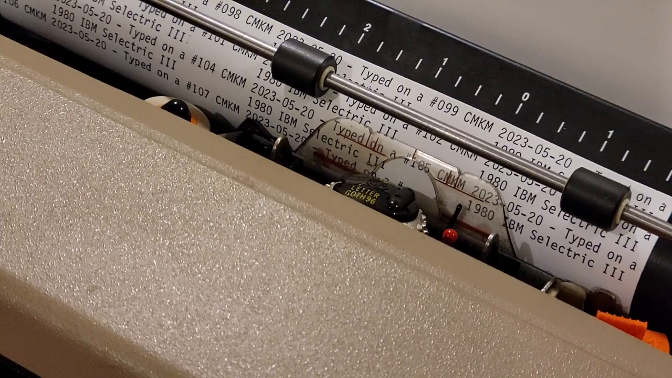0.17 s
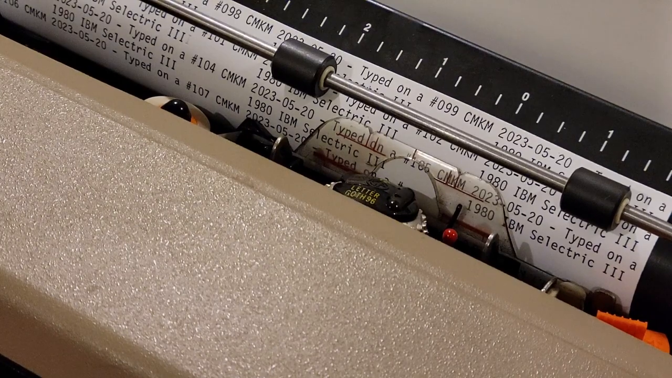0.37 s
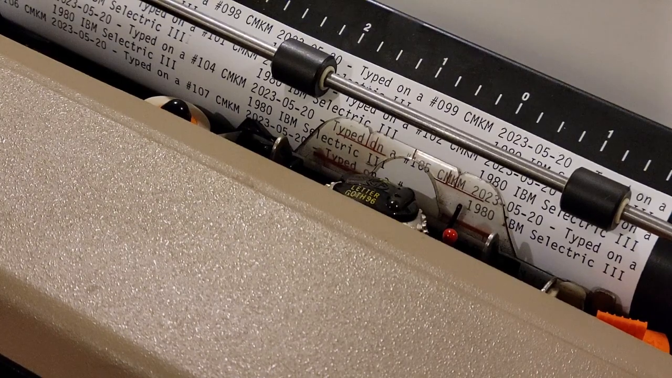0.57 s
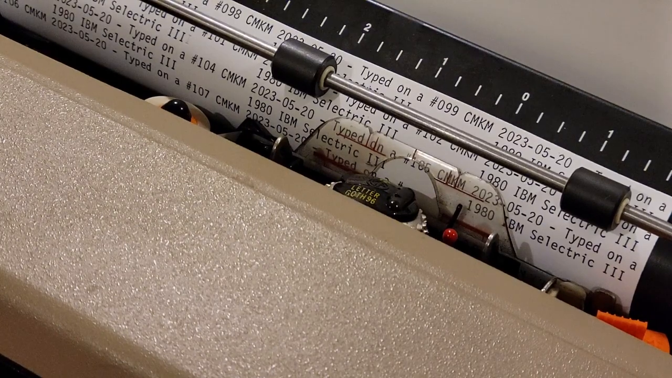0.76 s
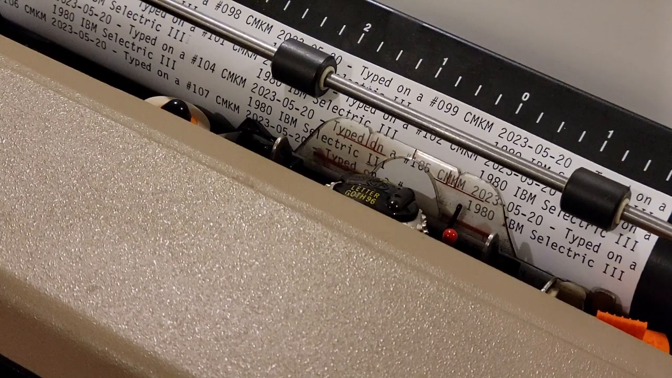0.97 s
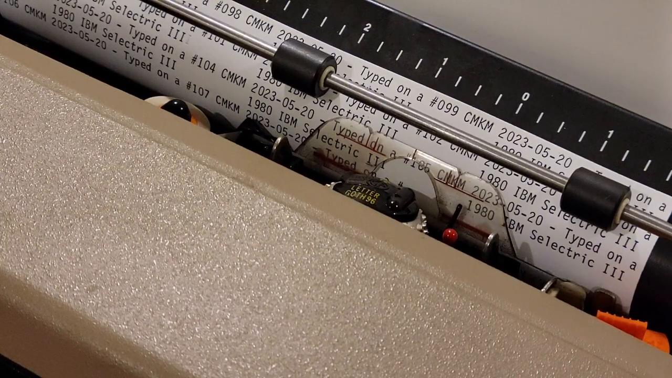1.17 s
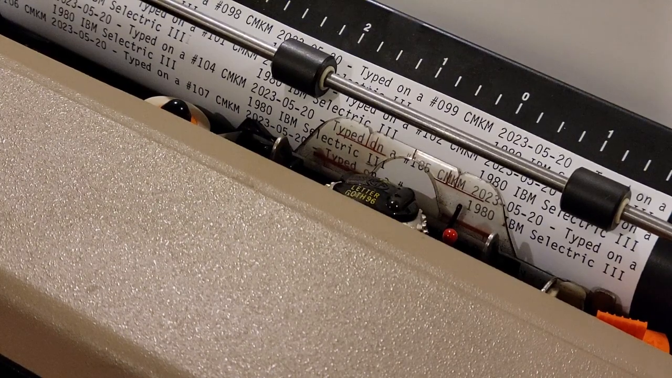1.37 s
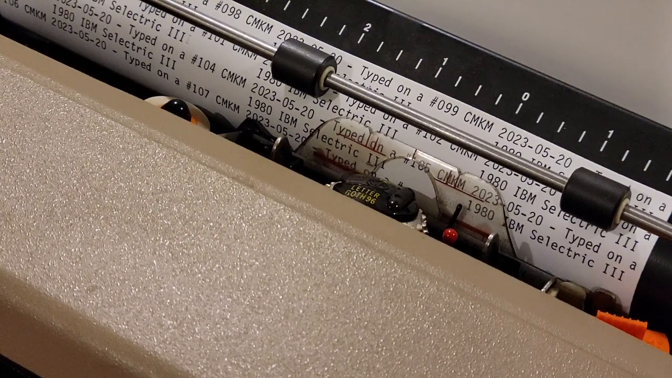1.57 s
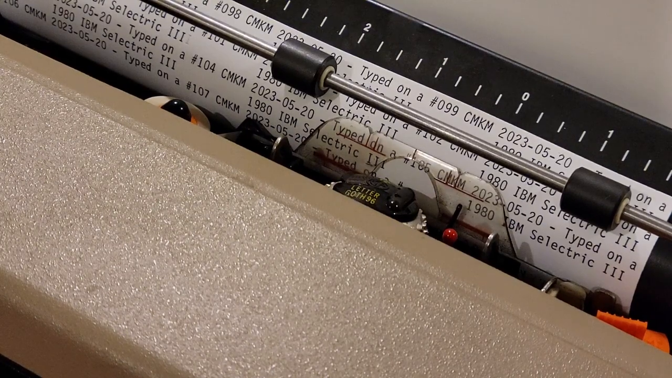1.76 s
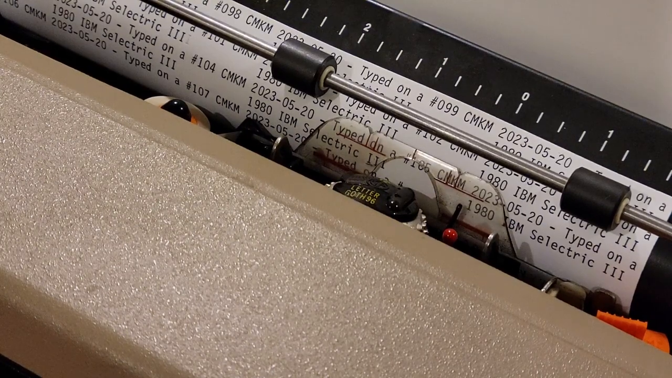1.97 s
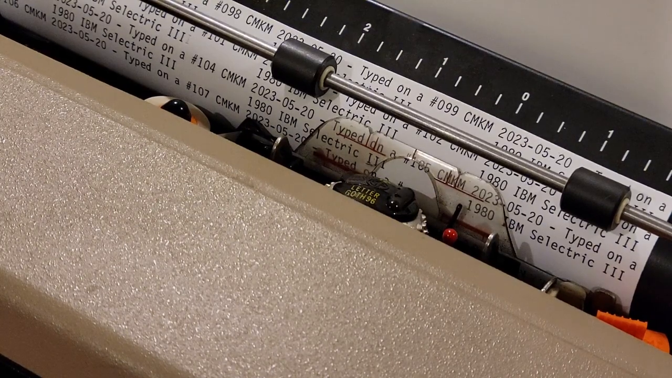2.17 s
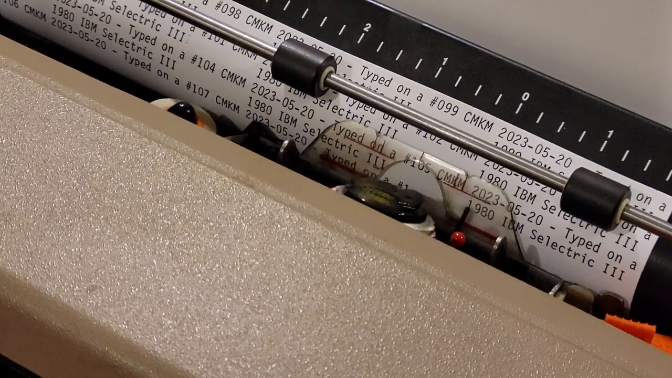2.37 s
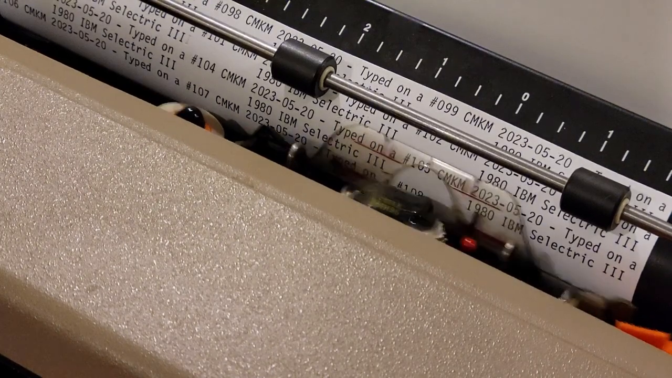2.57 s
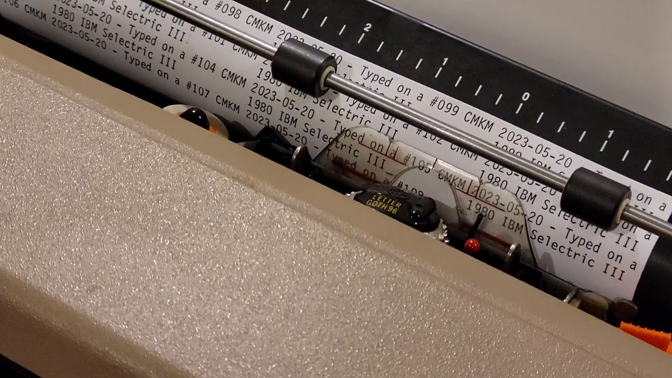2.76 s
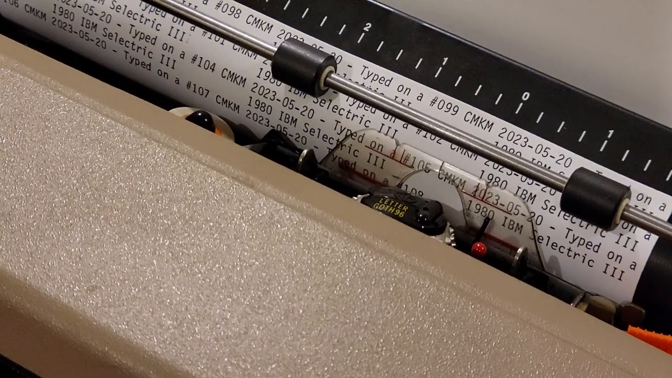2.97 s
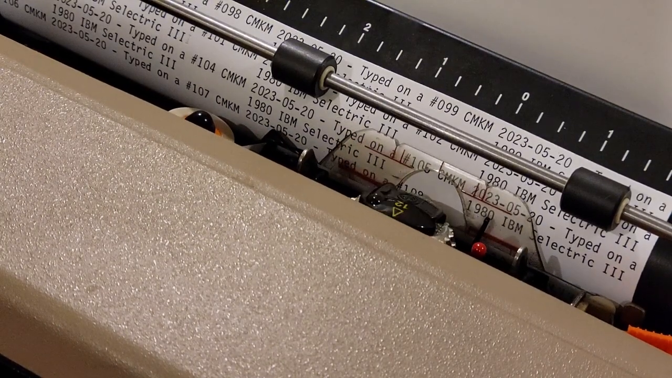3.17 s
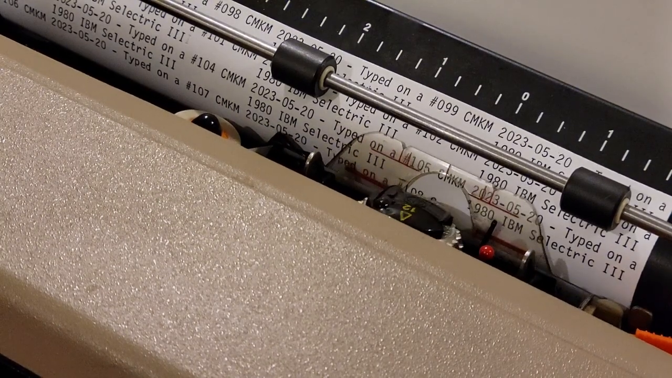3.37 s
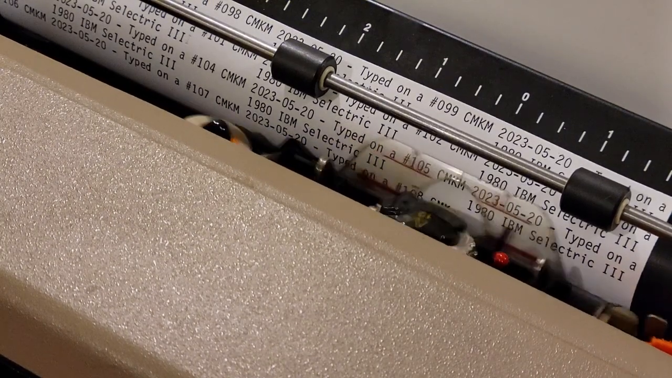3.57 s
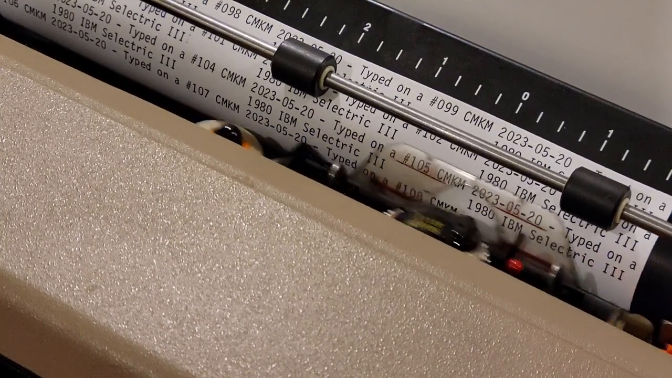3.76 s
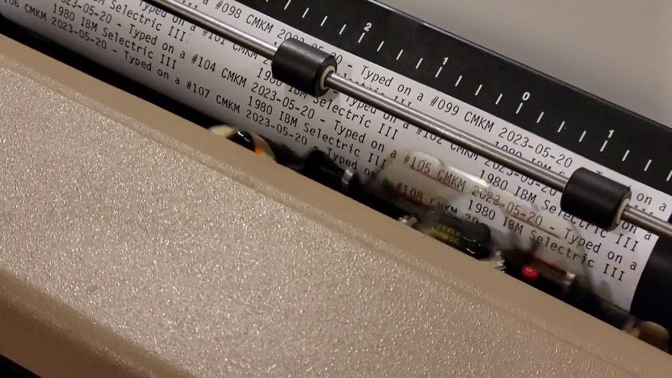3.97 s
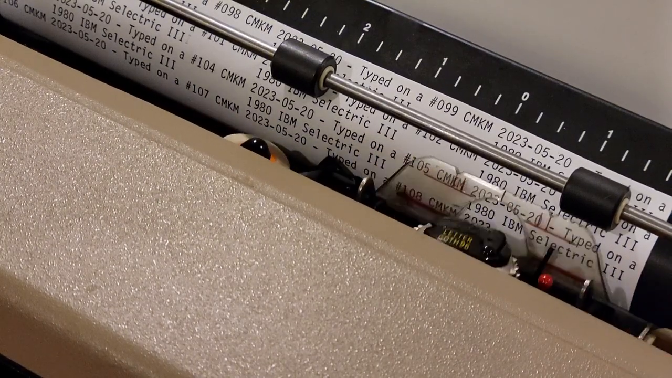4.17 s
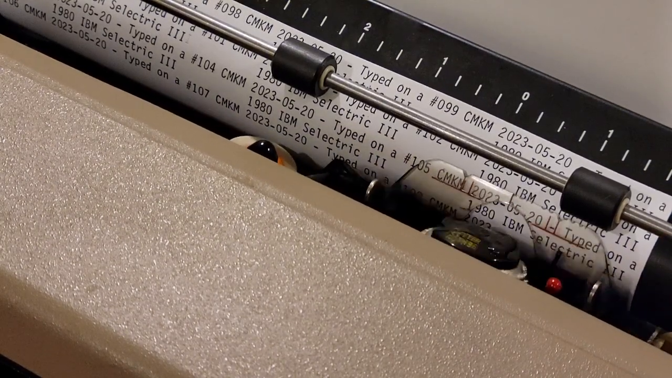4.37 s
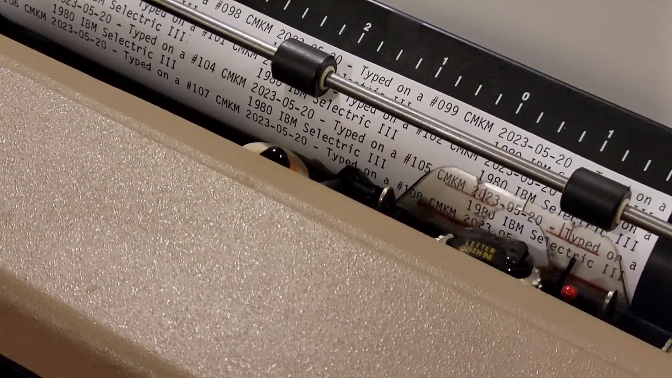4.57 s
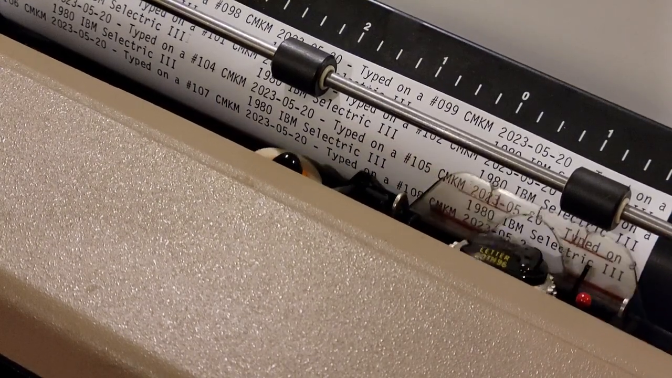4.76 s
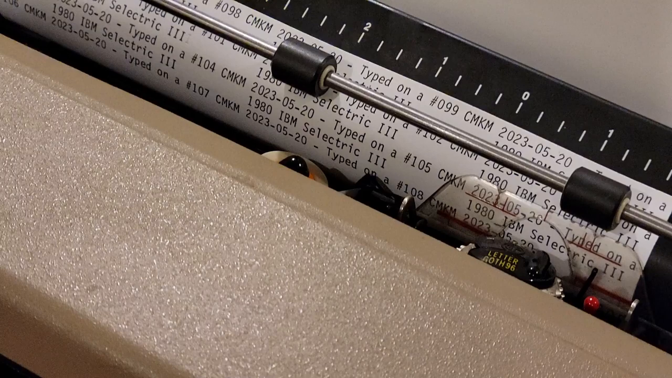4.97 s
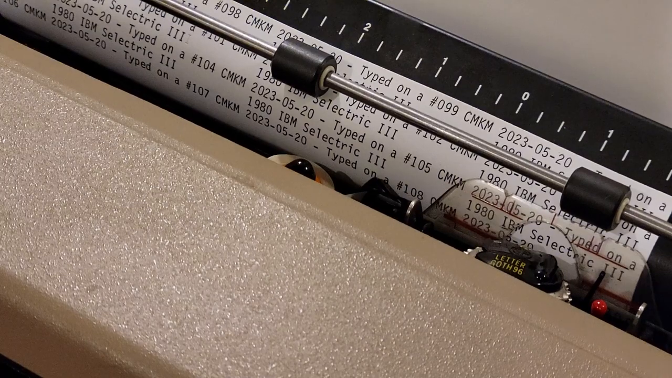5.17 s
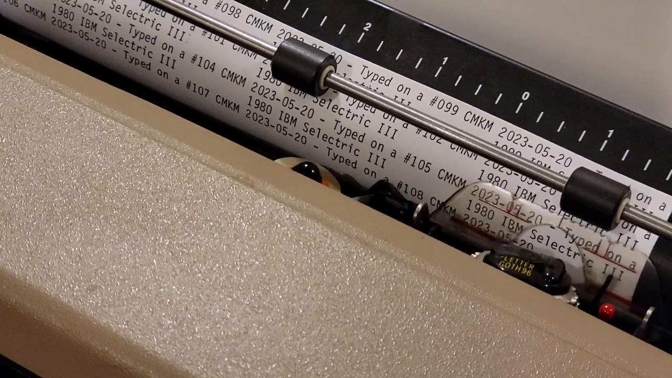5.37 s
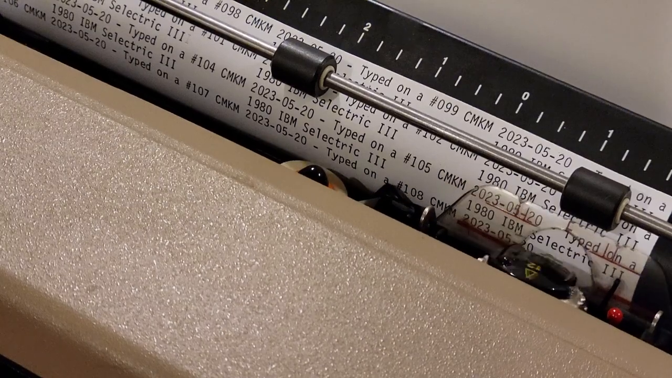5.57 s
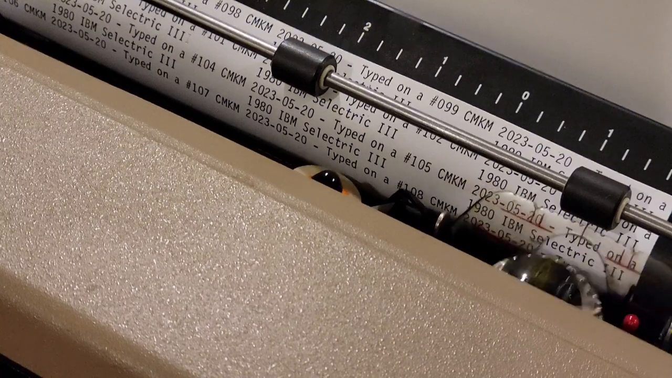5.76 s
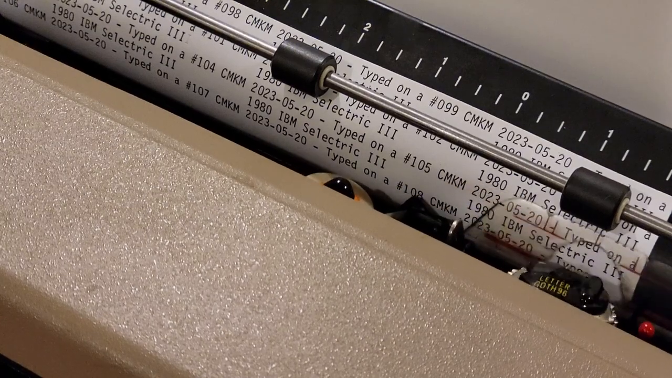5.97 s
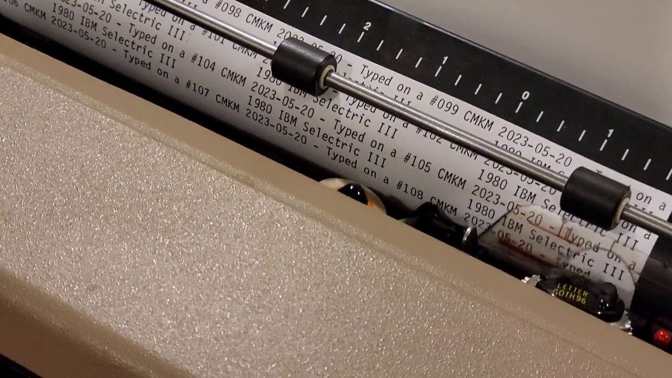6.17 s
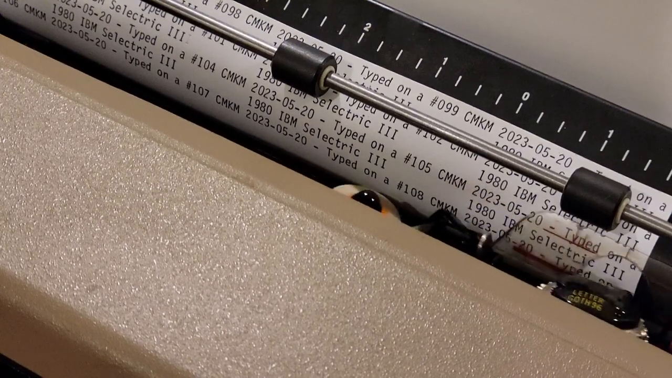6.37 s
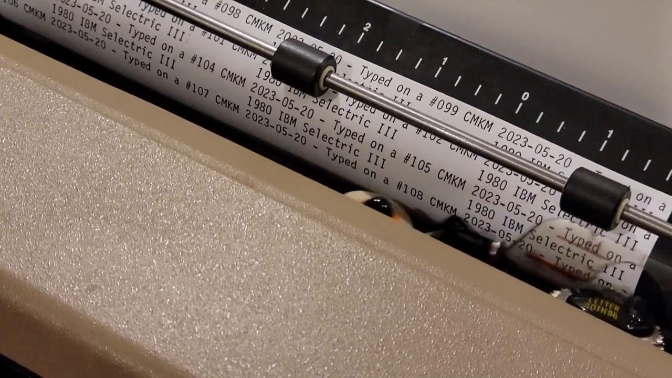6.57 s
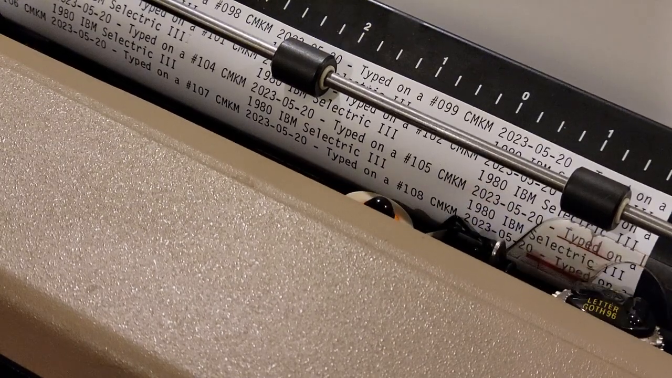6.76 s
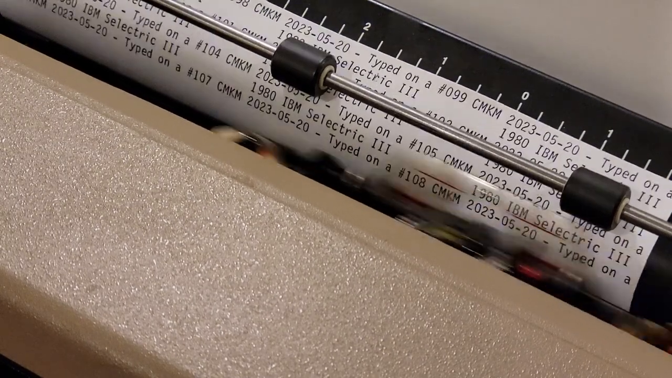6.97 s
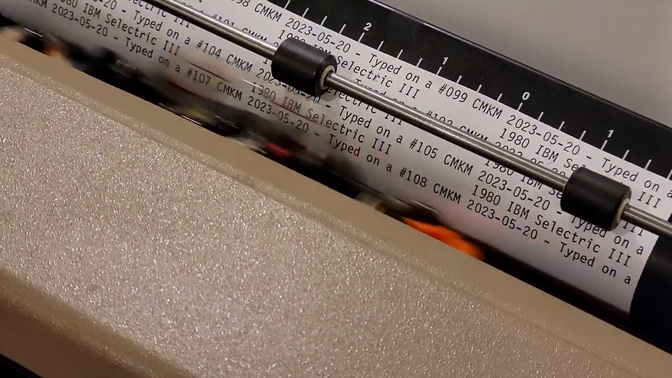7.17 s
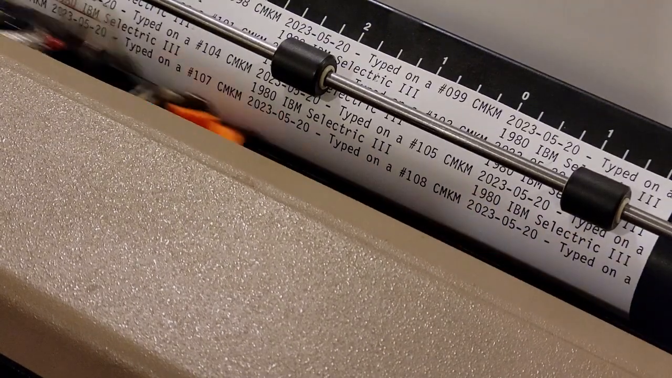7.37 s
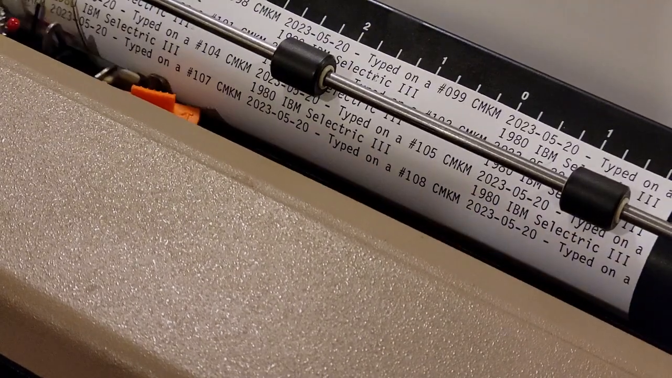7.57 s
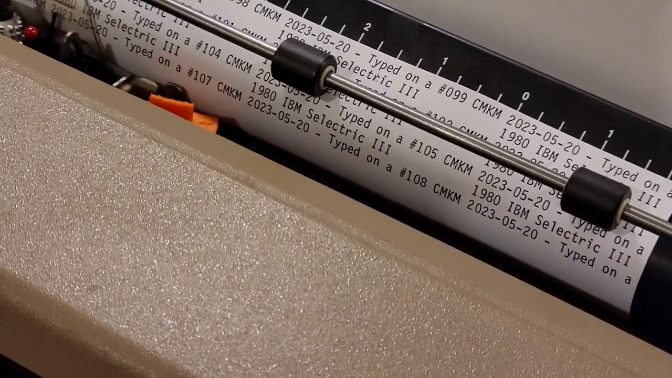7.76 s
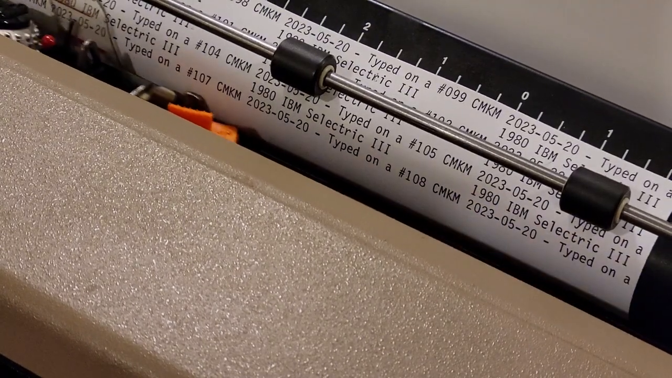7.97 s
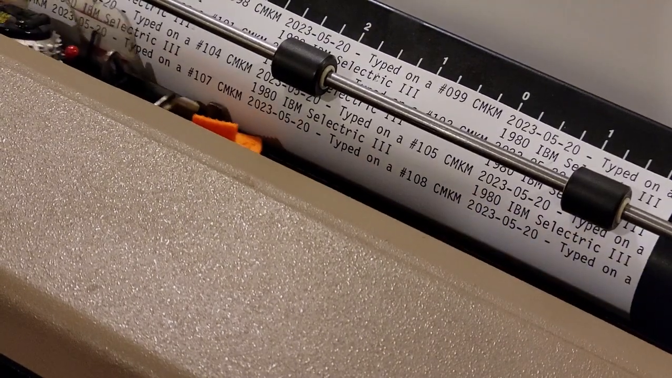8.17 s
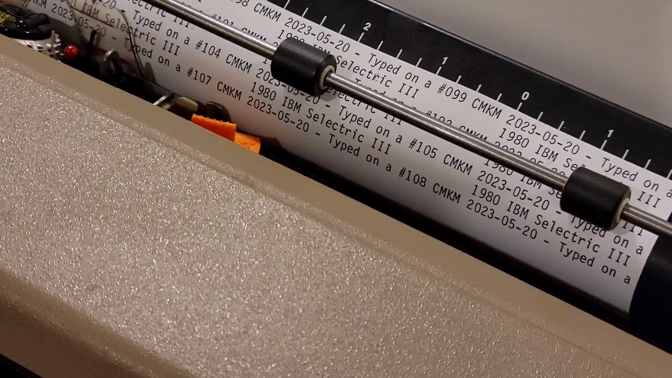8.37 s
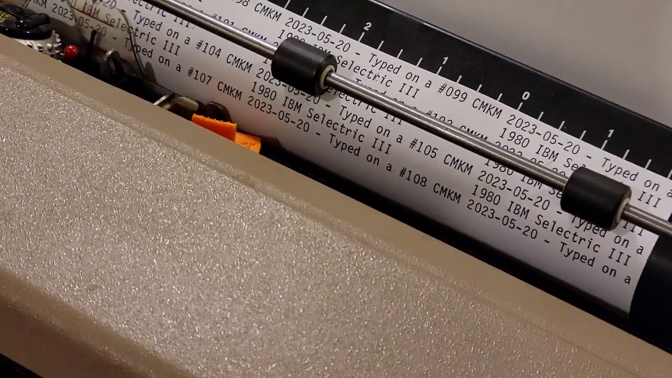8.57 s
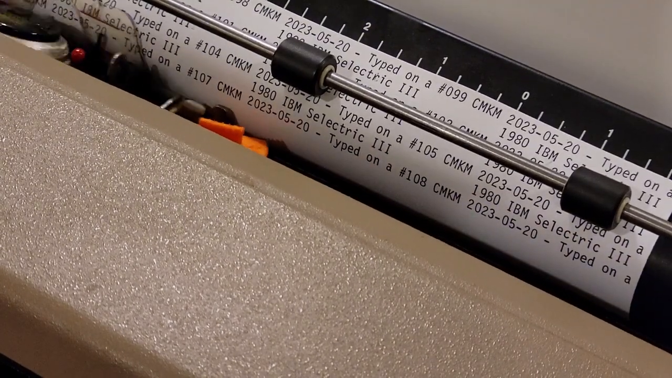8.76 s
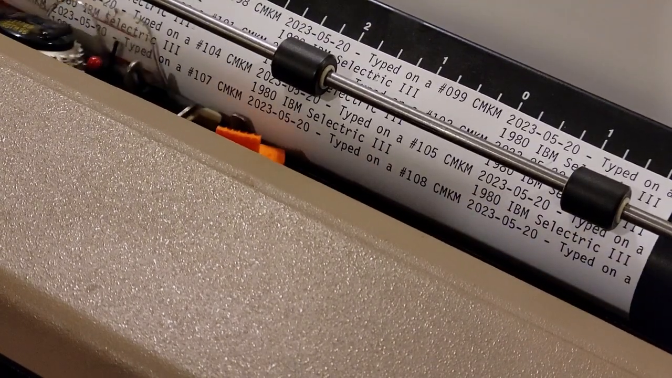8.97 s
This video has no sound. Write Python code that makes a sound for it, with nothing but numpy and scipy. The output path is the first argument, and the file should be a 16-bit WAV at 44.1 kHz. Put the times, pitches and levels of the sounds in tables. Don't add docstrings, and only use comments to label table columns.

```python
import sys
import numpy as np
from scipy import signal
from scipy.fft import rfft, irfft, next_fast_len
from scipy.io import wavfile
from scipy.ndimage import uniform_filter1d, map_coordinates

SR = 44100
rng = np.random.default_rng(int(sys.argv[2]) if len(sys.argv) > 2 else 0)


def volts_from_db(level):
    exponent = np.asarray(level, float) / 20
    return 10 ** exponent


def file_out(sig):
    cols = np.atleast_2d(sig).T
    lim = np.clip(cols, -1, 1)
    pcm = np.round(lim * 32767).astype(np.int16)
    wavfile.write(sys.argv[1], SR, pcm)


N = 397782

SHAFT_HZ = 29.38
PLAY_S, PLAY_DB = 0.0005, 1.5

# (frequency [Hz], width [Hz], level [dB])
CASING_MODES = [(2050, 810, -12), (2697, 505, 0), (3003, 162, 3.5), (3295, 560, -4)]
# (head lands [s], landing level [dB], clatter level [dB], relative casing ring [dB])
TYPED_LETTERS = [(2.35, -8.5, -10, 2.5), (2.467, -6, -9.5, 3), (2.57, -8.5, -8.5, 0), (3.352, -7, -9, 2),
                 (3.505, -9.5, -11.5, 2), (3.569, -8.5, -9.5, 1.5), (3.664, -5, -9.5, 1),
                 (3.909, -5.5, -10, 0.5), (3.972, -8, -10.5, 0), (4.04, -10, -9.5, 2), (4.116, -8.5, -9, 2),
                 (4.241, -8, -8.5, -0.5), (4.403, -6, -8, -2), (4.527, -8, -9, 0.5), (4.617, -11, -9, -0.5),
                 (4.731, -3.5, -9.5, -0.5), (4.823, -6.5, -9.5, 0.5), (5.281, -12, -9, 0.5),
                 (5.627, -8, -8, 0.5), (5.746, -12, -9.5, 1), (5.811, -16.5, -11, 2.5),
                 (5.91, -6.5, -10, 0.5), (6.053, -11, -8, 1.5), (6.271, -6, -9.5, 0.5),
                 (6.353, -7.5, -9.5, -0.5), (6.564, -15.5, -10.5, 2), (8.741, -4, -10, -2),
                 (8.803, -4.5, -8.5, -1.5), (8.871, -6, -9.5, -1), (8.938, -5.5, -9.5, 1.5)]
# (pawl drops [s], level [dB], delay until the carrier settles [s], settling level [dB])
SINGLE_SPACES = [(2.9231, -7.5, 0.021, -11), (3.7908, -8.5, .028, -10.5), (5.0191, -8, 0.037, -15),
                 (5.4384, -7.5, 0.038, -10.5), (6.159, -8.5, .049, -14), (6.4554, -8, 0.042, -17)]


def unit(x):
    return x / np.sqrt(np.mean(x ** 2) + 1e-20)


def along(points, hz):
    f, v = np.transpose(points)
    return np.interp(np.log(hz + 1), np.log(f + 1), v)


def curves(rows):
    s, *cols = np.transpose(rows)
    t = np.arange(N) / SR
    return [np.interp(t, s, c, -120, -120) for c in cols]


def wobble(rate):
    knots = rng.standard_normal(int(N * rate / SR) + 4)
    return map_coordinates(knots, [np.arange(N) * rate / SR], order=1)


def filtered(x, response):
    m = next_fast_len(N + SR // 4, True)
    return irfft(rfft(x, m) * response(np.fft.rfftfreq(m, 1 / SR)), m)[..., :N]


def modes(table):
    def response(f):
        total = 0
        for k, (centre, width, db) in enumerate(table):
            peak = 1j * f * width / (centre * centre - f * f + 1j * f * width)
            total = total + (-1) ** k * volts_from_db(db) * peak
        return total
    return response


def spread(pair, gain):
    # (frequency [Hz], left-right likeness [0 to 1])
    likeness = [(60, 0.86), (380, 0.82), (950, 0.37), (2400, 0.41), (5000, 0.059), (9000, 0)]
    turn = lambda hz: np.arccos(np.clip(along(likeness, hz), -1, 1)) / 2
    mid, side = filtered(pair, lambda hz: gain(hz) * np.array([np.cos(turn(hz)), np.sin(turn(hz))]))
    return np.array([mid + side, mid - side])


def stereo_noise(spectrum):
    return unit(spread(rng.standard_normal((2, N)), lambda hz: volts_from_db(along(spectrum, hz))))


def dying(times, dbs, t60):
    power = np.bincount((times * SR).astype(int), volts_from_db(2 * dbs), N)[:N]
    return np.sqrt(np.abs(signal.lfilter([1], [1, -volts_from_db(-120 / (t60 * SR))], power)))


def leading(times, dbs, t60):
    return dying((N - 1) / SR - times, dbs, t60)[::-1]


def rung(table, envelope):
    response = modes(table)
    gain = np.sqrt(np.mean(np.abs(response(np.fft.rfftfreq(SR, 1 / SR))) ** 2))
    return spread(envelope * rng.standard_normal((2, N)), response) / gain


def motor(touch):
    # (multiple of the shaft speed, level [dB])
    shaft_tones = [(120 / SHAFT_HZ, -59), (8, -47), (9, -62), (10, -59), (11, -60), (12, -59), (16, -68),
                   (17, -69), (24, -72), (29, -80), (36, -79), (44, -81)]
    # (frequency [Hz], level [dB per Hz])
    whirr_spectrum = [(20, -13.5), (80, -5.5), (190, -8), (330, -3.5), (450, -10.5), (750, -19.5),
                      (1320, -21.5), (1500, -28), (4000, -37), (8500, -53), (11000, -49.5), (13500, -45),
                      (15800, -47)]
    turns = np.cumsum(SHAFT_HZ * (1 + 0.0011 * wobble(9))) / SR
    hum = 0
    for multiple, db in shaft_tones:
        tone = np.sin(2 * np.pi * (multiple * turns + rng.random()))
        hum = hum + volts_from_db(db + 3.5 + 1.3 * wobble(17)) * tone
    s, db, *_ = touch
    dip_db = -4 * np.tanh(300 * dying(s, db, t60=0.18))
    beat = 1 + 0.13 * np.sin(2 * np.pi * turns)
    whirr = volts_from_db(-53.0 + 0.57 * wobble(21.0)) * beat * stereo_noise(whirr_spectrum)
    return volts_from_db(dip_db) * hum * volts_from_db([[-0.2], [0.2]]) + whirr


def springs():
    # (time [s], level [dB])
    idle_ticks = [(.944, -48), (.949, -50)]
    # (time [s], level [dB], pitch [Hz], time to fade 60 dB [s])
    lone_rings = [(2.946, -22, 13000, .04), (3.146, -22.5, 153, 0.18), (3.194, -8, 14650, 0.046),
                  (3.19, -36, 9520, 0.062), (3.198, -24.5, 320, 0.19), (5.558, -6, 14760, 0.036),
                  (6.895, -16, 1935, 0.041), (7.432, -14, 500, 0.099)]
    tick_spectrum = [(4800, -30), (6000, 3), (10000, -10), (13000, -5)]  # (Hz, dB)
    tick = dying(*np.transpose(idle_ticks), t60=0.017) * stereo_noise(tick_spectrum)
    out = np.zeros((2, N + SR))
    t = np.arange(SR // 4) / SR
    for s, db, hz, t60 in lone_rings:
        drift = np.cumsum(rng.normal(0, hz * 1.5e-6, (2, len(t))), axis=1)
        start = round(s * SR)
        out[:, start:start + len(t)] += volts_from_db(db - 60 * t / t60) * np.sin(2 * np.pi * hz * t + drift)
    return out[:, :N] + tick


def echoes():
    # (frequency [Hz], time to fade 60 dB [s])
    fade_times = [(150, 0.95), (600, 0.23), (3000, 0.21), (15000, 0.19)]
    hz, t, z = signal.stft(rng.standard_normal((2, SR // 2)), SR, nperseg=256)
    early = volts_from_db(-60 * t / along(fade_times, hz)[:, None])
    late = volts_from_db(-10 - 60 * t / 0.55) / (1 + (hz / 4000) ** 2)[:, None]
    dry_bass = (hz / (hz + 700))[:, None]
    tail = signal.istft(z * (early + late) * dry_bass, SR, nperseg=256)[1]
    tail = 0.42 * tail[0] + tail * [[0.3], [0.8]]
    return tail / np.linalg.norm(tail, axis=1, keepdims=True)


def room(x):
    place = np.sign(wobble(25)) * np.pi / 4 + np.pi / 4
    late = np.pad(x, ((0, 0), (130, 0)))[:, :N]
    shares = (np.cos(place), np.sin(place))
    return sum(signal.oaconvolve(late * share, echoes(), axes=1)[:, :N] for share in shares)


def played(times, dbs, pattern, snap_db, casing_db=0):
    ds, ddb, ring_db = np.transpose(pattern)
    play = rng.standard_normal((len(times), 3, len(ds)))
    s = times[:, None] + ds + PLAY_S * play[:, 0]
    db = dbs[:, None] + ddb + PLAY_DB * play[:, 1]
    ring = ring_db + casing_db + PLAY_DB * play[:, 2]
    return np.reshape([s, db, ring, snap_db + 0 * db], (4, -1))


def steps():
    single = [row[:2] for row in SINGLE_SPACES]
    run = [(7.6138 + 0.06197 * k, -7) for k in range(10)]  # (s, dB)
    return np.transpose(single + run)


def contacts():
    sharpness = dict(trip=10, head=7, cam=-2.5, pawl=-5, other=4)
    # (time [s], level [dB])
    key_trips = [(2.2969, -9.5), (2.416, -5.5), (2.5171, -5), (3.1429, -6.5), (3.3002, -5.5), (3.467, -8.5),
                 (3.612, -12), (3.858, -7.5), (4.1844, -9), (4.349, -7), (4.4754, -4.5), (4.5614, -6.5),
                 (4.679, -4), (4.7685, -7), (5.2252, -4), (5.5752, -9), (5.678, -4), (5.8572, -7),
                 (5.9976, -9.5), (6.2178, -10), (6.2993, -6), (6.5099, -6.5), (8.6875, -3.5)]
    # (time from the trip [s], level from it [dB], relative casing ring [dB])
    trip_pattern = [(-.009, -20, -9), (0, -6, -4)]
    # (time from landing [s], level from the clatter [dB], relative casing ring [dB])
    cycle_pattern = [(-.053, -9.5, 2.5), (-.039, -4, 2.5), (-.022, 0.5, -2.5), (-.007, -1, 3.5),
                     (0.013, -6.5, -10), (.021, 1, -15), (.04, -7, -12.5)]
    # same columns, [s], [dB], [dB]
    head_pattern = [(0, -3, 2.5)]
    # (time [s], level [dB])
    bar_presses = [(2.8515, -22.5), (3.721, -15), (4.9447, -17), (5.374, -15.5), (7.546, -15)]
    # (time from the press [s], level from it [dB], relative casing ring [dB])
    bar_pattern = [(0, -1, -8), (.0095, 3.5, -1.5)]
    # (time from the drop [s], level from it [dB], relative casing ring [dB])
    pawl_pattern = [(-.008, -4.5, -5), (-.004, -8.5, -15), (0, -3.5, -15), (.004, -4, -1.5)]
    # (time [s], level from it [dB], relative casing ring [dB])
    settle_pattern = [(0, -1.5, -11.5), (.009, -10.5, -8)]
    # (time [s], peak level [dB], relative casing ring [dB])
    stray_keys = [(2.8734, -19.5, -2), (3.1222, -42, 2), (3.15, -17.5, 9), (3.1614, -18, -7),
                  (3.191, -15.5, -17), (3.196, -19.5, -20), (3.7119, -18.5, -17), (3.768, -13.5, -4),
                  (5.505, -7, 0), (5.5181, -13, -12.5), (5.5588, -8.5, -10.5), (6.433, -18.5, -6),
                  (9.0069, -15.5, -9)]
    # (time [s], peak level [dB],
    # relative casing ring [dB])
    return_clicks = [(6.7984, -33, -22), (6.8068, -10.5, -11), (6.834, -18, -5), (6.856, -18.5, -8),
                     (6.87, -20.5, 5), (6.8932, -17.5, 8), (6.899, -29.5, 17), (6.924, -11.5, -3),
                     (6.9287, -10.5, -7), (7.379, -38.5, 2), (7.427, -15, -4), (7.4371, -10, 0.5),
                     (7.452, -16, 2.5), (7.538, -19, 0)]
    s, _, clatter_db, casing_db = np.transpose(TYPED_LETTERS)
    drop, _, later, settle_db = np.transpose(SINGLE_SPACES)
    casing_db = casing_db[:, None]
    other = sharpness["other"]
    single = [(*row, other) for row in stray_keys + return_clicks]
    return np.hstack([
        played(*np.transpose(key_trips), trip_pattern, sharpness["trip"]),
        played(*steps(), pawl_pattern, sharpness["pawl"]),
        played(s, clatter_db, cycle_pattern, sharpness["cam"], casing_db),
        played(s, clatter_db, head_pattern, sharpness["head"], casing_db),
        played(*np.transpose(bar_presses), bar_pattern, other),
        played(drop + later, settle_db, settle_pattern, other),
        np.transpose(single)])


def patchy(x, depth_db):
    z = signal.stft(x, nperseg=128)[2]
    field = uniform_filter1d(rng.standard_normal(z.shape[1:]), size=3, axis=0)
    field = uniform_filter1d(field, size=6, axis=1)
    return unit(signal.istft(z * volts_from_db(depth_db * unit(field)), nperseg=128)[1][:, :N])


def chatter(spike_db):
    return unit(volts_from_db(spike_db * wobble(900)))


def steel(touch):
    # (frequency [Hz], level [dB per Hz])
    steel_spectrum = [(410, -11), (700, -8), (1290, -3), (1550, -8.5), (1830, -8.5), (2890, -16.5),
                      (4330, -6.5), (6310, -6), (11000, -11), (14300, -3.5), (15700, -7.5)]
    # (frequency [Hz], width [Hz], level [dB])
    cover_modes = [(320, 55, 5), (500, 100, -2.5), (830, 160, -6.5)]
    s, db, ring_db, snap_db = touch
    scrape = volts_from_db(-7.0) * leading(s, db, t60=0.026)
    crack = volts_from_db(-5) * dying(s, db + snap_db, t60=0.0051)
    rattle = volts_from_db(-6) * dying(s, db, t60=0.084) * chatter(spike_db=1.5)
    bright = (scrape + crack + rattle) * patchy(stereo_noise(steel_spectrum), depth_db=3)
    hardest = volts_from_db(-9) * dying(s, db + 1.5 * snap_db, t60=0.002) * rng.standard_normal(N)
    bright = bright + filtered(hardest, lambda hz: 1j * hz / (1500 + 1j * hz))
    db = db + ring_db
    push = volts_from_db(-14.0) * leading(s, db, t60=0.013)
    push = push + volts_from_db(-2.5) * dying(s, db, t60=0.003)
    push = push + volts_from_db(-13) * dying(s, db, t60=0.12)
    cover_push = volts_from_db(-17) * dying(s + 0.0098, db, t60=0.16)
    return bright + rung(CASING_MODES, push) + rung(cover_modes, cover_push)


def landings():
    # (relative frame ring [dB], relative desk boom [dB])
    landing = (-11, -23.5)
    # (time from landing [s], level [dB], frame ring [dB], desk boom [dB])
    cam = (-.04, -19.5, 4.5, -12)
    # (time from the drop [s], level from it [dB], frame ring [dB], desk boom [dB])
    stop = (.005, -12.5, -0.5, -18.5)
    # (time [s], peak level [dB], relative frame ring [dB], desk boom [dB])
    thuds = [(3.152, -36.5, 19, 0), (5.562, -25.5, -1, -9), (6.904, -12, -5, -23), (7.432, -20.5, 4.5, -7),
             (8.176, -15, -21.5, -33)]
    heads = [(s, db, *landing) for s, db, _, _ in TYPED_LETTERS]
    cams = [(s + cam[0], *cam[1:]) for s, *_ in TYPED_LETTERS]
    stops = [(s + stop[0], db + stop[1], *stop[2:]) for s, db in steps().T]
    rows = np.transpose(heads + cams + stops + thuds)
    play = rng.standard_normal(rows.shape)
    return rows + PLAY_DB * play * [[0], [0], [1], [1]]


def blows(hit):
    # (frequency [Hz], width [Hz], level [dB])
    roller_modes = [(320, 95, -1), (465, 170, 3), (740, 200, -8)]
    # (frequency [Hz], width [Hz], level [dB])
    frame_modes = [(1065, 130, -1.5), (1327, 100, 2)]
    s, db, frame_db, _ = hit
    at = ((s + 0.00183) * SR).astype(int)
    rebound = at + (SR * (0.00463 + 0.0033 * rng.random(len(s)))).astype(int)
    push = np.bincount(at, volts_from_db(db), N) - 0.72 * np.bincount(rebound, volts_from_db(db), N)
    spot = volts_from_db(1.3 * np.array([wobble(30) for _ in roller_modes]))

    def each_mode(f):
        soft = 1 + 1j * f / 1500
        return np.array([(-1) ** k * modes([mode])(f) / soft for k, mode in enumerate(roller_modes)])

    roller = volts_from_db(32.5) * filtered(spot * push, each_mode).sum(axis=0)
    edge = np.bincount(at, volts_from_db(db + frame_db), N)
    hard = lambda f: volts_from_db(26.5) * modes(frame_modes)(f) + volts_from_db(15.5) * modes(CASING_MODES)(f)
    knock = roller + filtered(edge, hard)
    frame = rung(frame_modes, volts_from_db(-5) * dying(s + 0.00033, db + frame_db, t60=0.062))
    return knock + frame * volts_from_db([[-2.2], [2.2]])


def shaking(hit):
    # (frequency [Hz], width [Hz], level [dB])
    desk_modes = [(34.4, 21, -4.5), (75.8, 13.4, 4), (149.7, 27.4, -2)]
    s, db, _, desk_db = hit
    return rung(desk_modes, volts_from_db(0.5) * dying(s, db + desk_db, t60=0.51)) * volts_from_db([[-1.1], [1.1]])


def slide():
    # (time [s], level [dB])
    glide = [(6.97, -42.5), (7.1, -45.5), (7.3, -45), (7.43, -37.5)]
    # (frequency [Hz], width [Hz], level [dB])
    rail_modes = [(150, 68, 6), (469, 170, 3), (1050, 260, 3), (2640, 200, 3), (4480, 2500, -22)]
    turn = 2 * np.pi * SHAFT_HZ * np.arange(N) / SR
    bump = np.exp(0.4 * np.sin(turn + 0.8 * wobble(12)))
    return rung(rail_modes, volts_from_db(curves(glide)[0] + 3.5 * wobble(150)) * unit(bump))


def scene():
    touch, hit = contacts(), landings()
    machine = springs() + steel(touch) + blows(hit) + slide()
    return motor(touch) + machine + volts_from_db(-6.0) * room(machine) + shaking(hit)


def low_pass(x):
    return signal.sosfilt(signal.butter(12, 16860, fs=SR, output="sos"), x)


def record(dry):
    full = dry / (1 + np.abs(dry) ** 6) ** (1 / 6)
    full[0, 2:] = full[0, :-2].copy()
    top_hz = 16050
    cut = lambda hz: volts_from_db(np.interp(hz, [top_hz - 250, top_hz, top_hz + 500], [0, -34, -55]))
    mix = filtered(full, cut)
    return low_pass(mix)


dry = scene()
out = record(dry)
file_out(out)
```